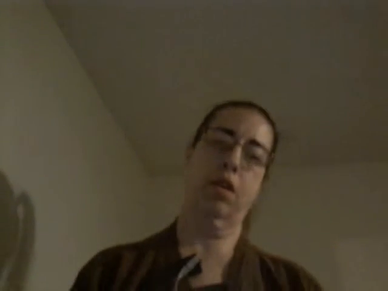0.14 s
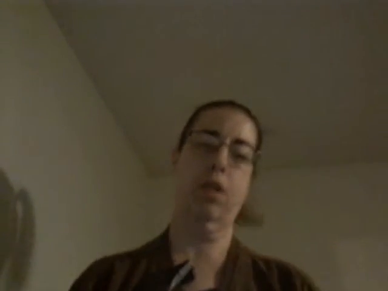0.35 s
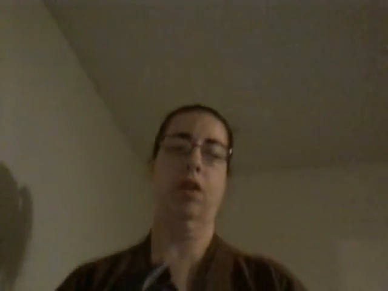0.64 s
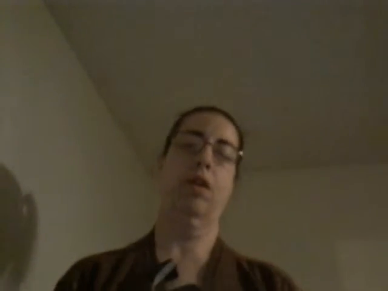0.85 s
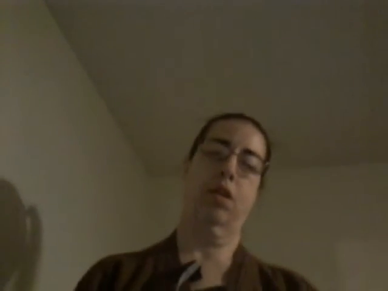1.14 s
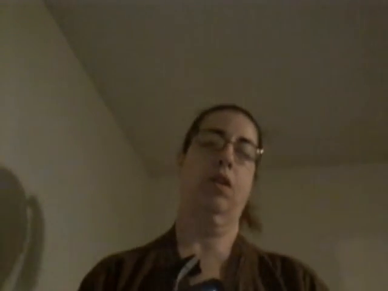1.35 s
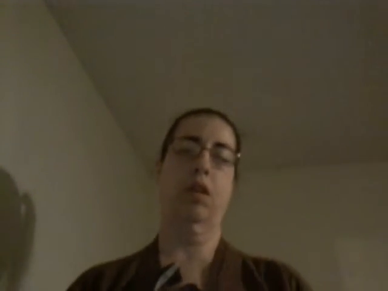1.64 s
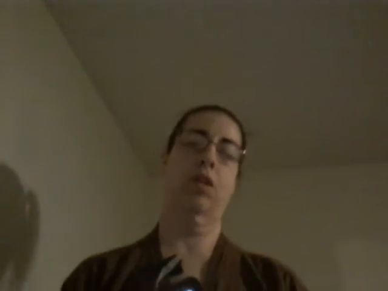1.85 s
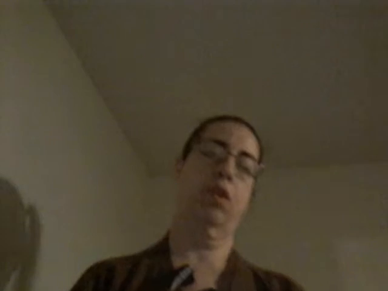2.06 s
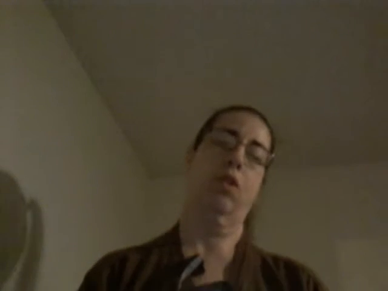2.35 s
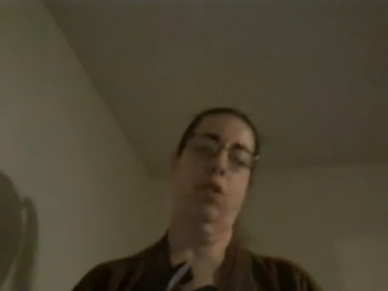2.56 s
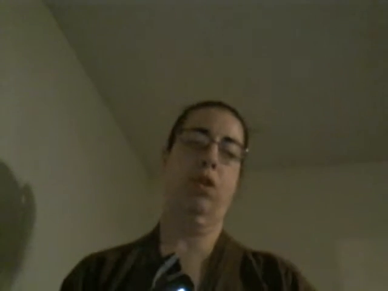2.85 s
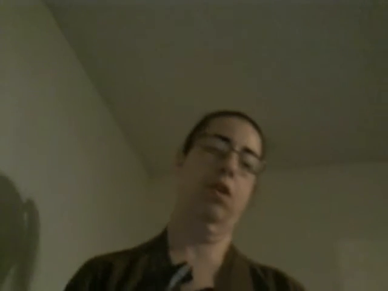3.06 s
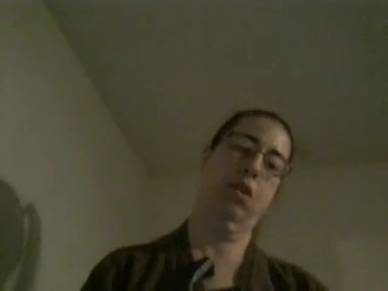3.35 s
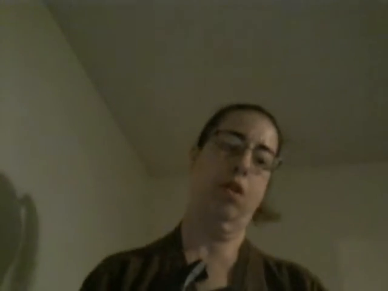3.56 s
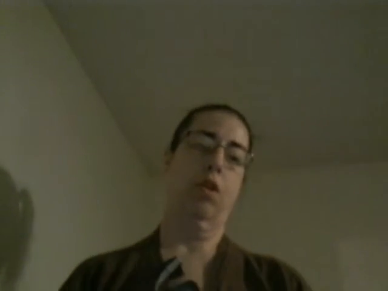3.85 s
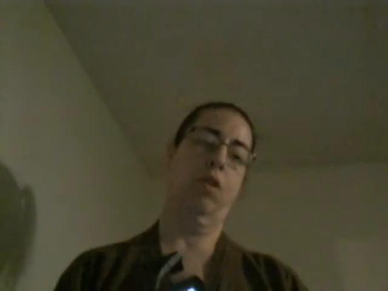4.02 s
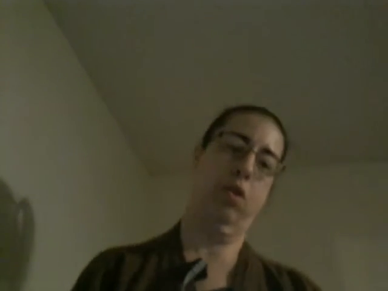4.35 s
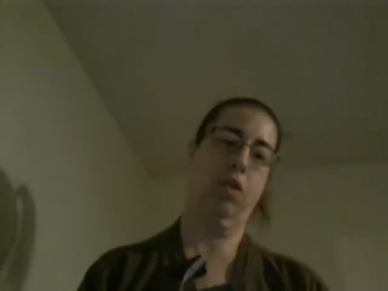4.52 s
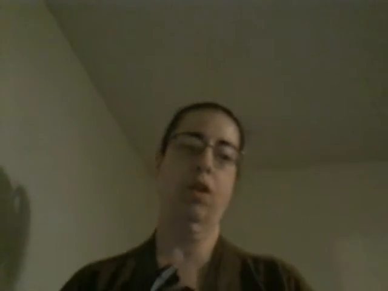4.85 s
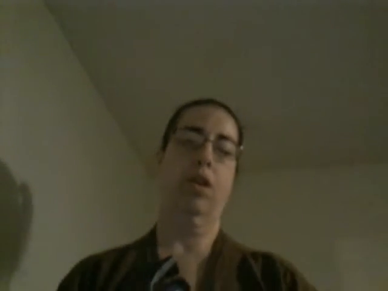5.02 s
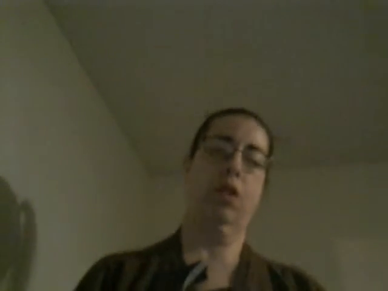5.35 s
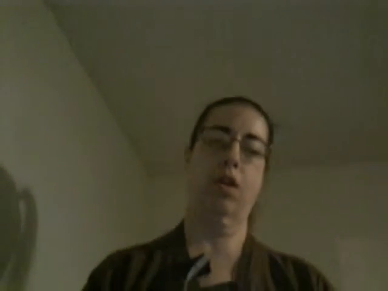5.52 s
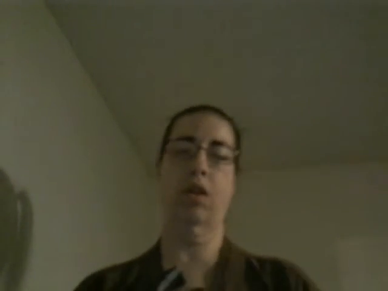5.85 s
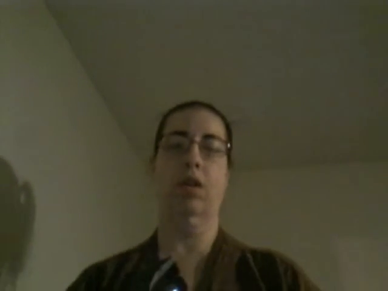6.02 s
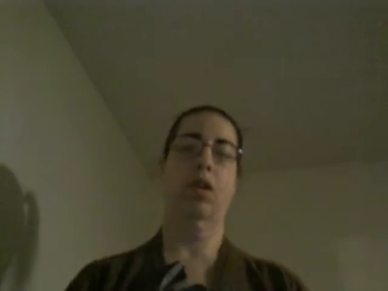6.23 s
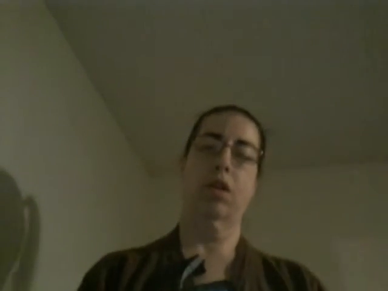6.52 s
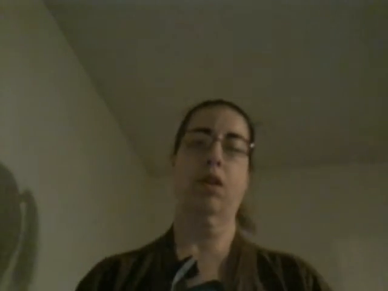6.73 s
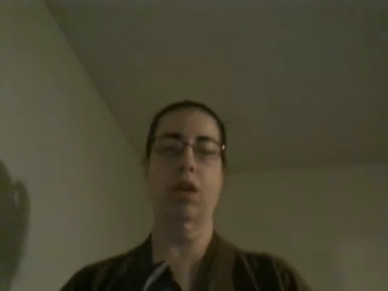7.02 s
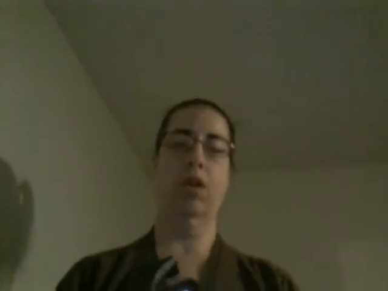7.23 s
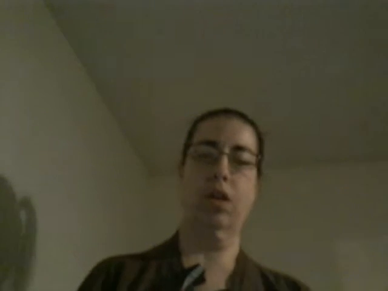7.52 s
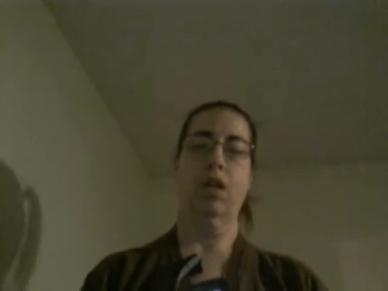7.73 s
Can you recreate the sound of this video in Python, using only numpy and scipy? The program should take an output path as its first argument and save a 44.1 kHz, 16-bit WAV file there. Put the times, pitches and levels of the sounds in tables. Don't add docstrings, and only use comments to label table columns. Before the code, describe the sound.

A treadmill is already running in a small room, close to a laptop microphone with little deep bass and softened treble. Belt rumble and hiss never stop, and a nearly pure motor whine peaks around 415 Hz at each landing, sags to about 355 Hz under the weight, then recovers. Footfalls come about every 0.53 seconds: light heel scuff, flat sole slap, dull thump and crunch of the deck, then a faint drag of the other shoe. The first step at 0.05 is mild; at 0.57 a sharper slap brings a high clean squeak and bright tick. Shorter, lower squeaks follow near 1.1, 1.7 and 2.2. From 2.7 to 6.5 steps are softer, with ticks on alternate landings and tiny grip chirps. A rough squeak comes at 7.0, then the loudest slap and squeak at 7.5, with a short room tail.

```python
import sys
import numpy as np
from scipy import signal
from scipy.fft import rfft, irfft
from scipy.io import wavfile
from scipy.ndimage import uniform_filter1d

SR = 44100
rng = np.random.default_rng(int(sys.argv[2]) if len(sys.argv) > 2 else 0)


def undo_db(level):
    steps = np.asarray(level, float) / 20
    return 10 ** steps


def file_out(sig):
    cols = np.atleast_2d(sig).T
    lim = np.clip(cols, -1, 1)
    pcm = np.round(lim * 32767).astype(np.int16)
    wavfile.write(sys.argv[1], SR, pcm)


N = 347301

# landing in seconds, sag in seconds, sag pitch in Hz.
STRIDE_CYCLES = [(-.45, -0.196, 364), (0.086, 0.312, 369.4), (0.618, 0.848, 347), (1.168, 1.397, 362),
                 (1.686, 1.94, 354.7), (2.248, 2.47, 361.3), (2.766, 3.006, 354.9), (3.31, 3.544, 362.4),
                 (3.847, 4.068, 358.4), (4.377, 4.606, 366.7), (4.908, 5.141, 352.3), (5.428, 5.655, 365.4),
                 (5.969, 6.181, 354), (6.499, 6.757, 363.8), (7.031, 7.264, 349), (7.571, 7.822, 355.7),
                 (8.1, 8.35, 355)]
# start in seconds, hiss level in dB, knock level in dB, length in seconds.
SOLE_SLAPS = [(0.042, -29, -45.5, 0.023), (0.567, -17.5, -37.5, 0.045), (1.112, -17, -39.5, 0.03),
              (1.648, -20, -43, 0.052), (2.198, -19, -38.5, 0.043), (2.724, -25, -45.5, 0.066),
              (3.261, -39, -50.5, 0.047), (3.791, -23, -43, 0.073), (4.327, -33, -48, 0.074),
              (4.847, -26, -45, 0.073), (5.377, -36.5, -49, 0.055), (5.887, -36, -50.5, 0.048),
              (5.94, -27.5, -45, 0.036), (6.435, -33, -53, 0.037), (6.4774, -32.5, -60, 0.098),
              (6.966, -23.5, -41, 0.074), (7.521, -15, -30, 0.041)]
# frequency in Hz, level in dB.
CRUNCH_SPECTRUM = [(300, -16.5), (450, 5), (600, -2.5), (900, -7.5), (1300, -14), (2000, -14.5),
                   (4000, -29)]
KNOCK_RISE_S = .004


def evened(x):
    return x / np.sqrt(np.mean(x ** 2) + 1e-20)


def read(points, hz):
    f, value = np.transpose(points)
    return np.interp(np.log(hz + 1), np.log(f + 1), value)


def add(mix, s, sound):
    part = mix[max(round(s * SR), 0):][:len(sound)]
    part += sound[:len(part)]


def coloured(x, spectrum):
    gain = undo_db(read(spectrum, np.fft.rfftfreq(len(x), 1 / SR)))
    return evened(irfft(rfft(x) * gain, len(x)))


def resonate(x, hz, width_hz):
    pole = np.exp((2j * np.pi * hz - np.pi * width_hz) / SR)
    return 2 * signal.lfilter([1 - abs(pole)], [1, -pole], x).real


def wander(seconds):
    size = int(seconds * SR)
    return evened(uniform_filter1d(uniform_filter1d(rng.standard_normal(N), size), size))


def grit(per_s, spread_db):
    clicks = rng.standard_normal(N) * (rng.random(N) < per_s / SR)
    return clicks * undo_db(spread_db * np.minimum(rng.exponential(1, N), 4))


def tent(t, start, end, rise, fall):
    return -rise * np.maximum(start - t, 0) - fall * np.maximum(t - end, 0)


def rubs(events, spectrum, rise_s, fall_s, trim_db, grains_per_s=9000, spread_db=1.0):
    noise = coloured(grit(grains_per_s, spread_db), spectrum)
    drive, t = np.zeros(N), np.arange(8000) / SR
    for s, db, length in events:
        hold = np.minimum(t / rise_s, 1) * undo_db(-60 * np.minimum(t, length))
        fall = np.exp(-np.maximum(t - length, 0) / fall_s)
        add(drive, s - rise_s / 2, undo_db(db + trim_db) * hold * fall)
    return noise * drive


def pings(events, t60_s, rise_s):
    out, t = np.zeros(N), np.arange(1500) / SR
    for s, db, hz in events:
        modes = sum(size * np.sin(2 * np.pi * hz * ratio * t)
                    for ratio, size in [(.93, 0.3), (1, 0.43), (1.1, 0.31)])
        add(out, s - rise_s, undo_db(db - 60 * t / t60_s) * (1 - np.exp(-t / rise_s)) * modes)
    return out


def bass_cut(x):
    return signal.sosfilt(signal.butter(3, 105, "high", fs=SR, output="sos"), x)


def room(x):
    # frequency in Hz, 60 dB decay time in seconds.
    decay = [(150, .45), (500, .35), (1650, .3), (2100, .21), (2600, .22), (4000, .22), (8000, .19)]
    echoes = np.zeros(SR // 2)
    at = np.arange(200, SR // 2 - 20, 20)
    echoes[at + rng.integers(0, 20, at.shape)] = rng.choice([-1., 1.], at.shape)
    hz, t, z = signal.stft(echoes, SR, nperseg=256)
    tail = signal.istft(z * undo_db(-60 * t / read(decay, hz)[:, None]), SR, nperseg=256)[1]
    return signal.fftconvolve(x, tail / np.linalg.norm(tail))[:N]


def freed():
    surge_lag_s = .02
    turning_s = (np.array(STRIDE_CYCLES)[:, :2] + [surge_lag_s, 0]).ravel()
    return np.interp(np.arange(N) / SR, turning_s, 1 - np.arange(len(turning_s)) % 2)


def belt():
    # frequency in Hz, level in dB per Hz.
    floor = [(20, -44), (100, -23.5), (159, -17), (190, -12), (300, -12), (400, -16.5), (524, -22),
             (700, -23), (886, -26), (1500, -29), (2830, -32.5), (4600, -31.5), (6600, -26), (9500, -32.5),
             (12000, -37.5), (14900, -35)]
    level_db, swell_db, swell_power = -47, 4.5, 1.4
    noise = coloured(rng.standard_normal(N), floor)
    hiss = signal.sosfilt(signal.butter(2, 1800, "high", fs=SR, output="sos"), noise)
    swell = undo_db(-1.5 + swell_db * freed() ** swell_power + 1.04 * wander(0.038))
    return undo_db(level_db) * (noise + (swell - 1) * hiss)


def motor():
    # time in seconds, depth in dB, half length in seconds.
    chokes = [
        (.94, -8, 0.036),
        (1.903, -5, 0.053),
        (3.025, -13, 0.057),
        (4.068, -5, 0.051),
        (5.19, -14, 0.037),
        (6.2, -14, 0.064),
        (7.301, -14, 0.029),
    ]
    surge_hz, recover_power, drop_power = 416.7, 1.3, 2.1
    whine_db, db_per_hz, pull_db = -35.5, 0.17, 1
    jolt_db, jolt_s, jolt_lead_s = -11.5, 0.032, 0.0044
    mode_hz, mode_width_hz, mode_db = 349, 3.1, 7.5

    t, (landing_s, sag_s, sag_hz) = np.arange(N) / SR, np.transpose(STRIDE_CYCLES)
    free = freed()
    slope = np.gradient(free)
    low_hz = np.interp(t, sag_s, sag_hz)
    surge = free ** np.where(slope > 0, recover_power, drop_power)
    hz = uniform_filter1d(low_hz + (surge_hz - low_hz) * surge, size=2500)
    turns = np.cumsum(hz + 0.72 * wander(.015)) / SR
    tone = np.sin(2 * np.pi * turns) + undo_db(-26.5) * np.sin(2 * 2 * np.pi * turns)

    pull = uniform_filter1d(np.sign(slope), size=4000)
    change_db = sum(db * np.exp(-((t - s) / half) ** 2) for s, db, half in chokes)
    change_db += sum(jolt_db * np.exp(-((t - s + jolt_lead_s) / jolt_s) ** 2) for s in landing_s)
    change_db += mode_db * np.exp(-((hz - mode_hz) / mode_width_hz) ** 2)
    level_db = whine_db + db_per_hz * (hz - surge_hz) + pull_db * pull + change_db
    return np.sqrt(2) * undo_db(level_db + 2.2 * wander(0.015)) * tone


def ticks():
    # time in seconds, peak level in dB, pitch in Hz.
    loose = [
        (0.6135, -11.5, 6760),
        (1.699, -15.5, 6430),
        (2.7791, -16.5, 6480),
        (3.8496, -14, 6960),
        (4.9106, -15, 6540),
        (5.9593, -12, 6330),
        (7.0294, -12.5, 6650),
    ]
    return pings(loose, t60_s=.016, rise_s=.001)


def deck():
    # heel in seconds, flat in seconds, heel boom in dB,
    # flat boom in dB, crunch in dB.
    landings = [(0.04, 0.095, -32.5, -32, -41.5), (0.565, 0.598, -25.5, -23.5, -30),
                (1.102, 1.176, -32, -32, -39), (1.606, 1.718, -32.5, -33.5, -36.5),
                (2.188, 2.27, -31.5, -31.5, -36), (2.71, 2.777, -33, -28, -37),
                (3.27, 3.305, -29.5, -33.5, -36.5), (3.774, 3.843, -32.5, -30, -37.5),
                (4.307, 4.36, -37.5, -27, -38.5), (4.848, 4.889, -35, -26.5, -35.5),
                (5.375, 5.44, -32, -31.5, -39), (5.884, 5.963, -31.5, -27, -36),
                (6.423, 6.503, -35.5, -32.5, -41), (6.944, 7.037, -30, -31.5, -36),
                (7.532, 7.62, -24, -32.5, -33)]
    # frequency in Hz, width in Hz, level in dB.
    deck_modes = [(165.5, 24.6, 0), (189, 23.3, -5), (228.4, 19.5, -0.5), (286.5, 30.6, -4.5),
                  (345, 18, -2), (107, 35, -29)]
    boom_rise_db_per_s, boom_fall_db_per_s, roll_dip_db_per_s = 345, 176, 50
    crunch_rise_db_per_s, crunch_fall_db_per_s, crunch_sag_db_per_s = 218, 136, 46

    knocks = grit(500, 2.2)
    boom = evened(sum((-1) ** k * undo_db(db) * resonate(resonate(knocks, hz, w), hz, 2 * w)
                      for k, (hz, w, db) in enumerate(deck_modes)))
    boom /= np.sqrt(uniform_filter1d(boom ** 2, 3000) + 0.32)
    crunch = coloured(grit(3000, 0.78), CRUNCH_SPECTRUM)
    booming, crunching = np.zeros((2, N))
    for heel, flat, heel_db, flat_db, crunch_db in landings:
        t = np.arange(max(heel - .2, 0), flat + .3, 1 / SR)
        dip_db = roll_dip_db_per_s * np.maximum(np.minimum(t - heel, flat - t), 0)
        boom_db = np.interp(t, [heel, flat], [heel_db, flat_db]) - dip_db
        boom_db += tent(t, heel, flat, boom_rise_db_per_s, boom_fall_db_per_s)
        add(booming, t[0], undo_db(boom_db))
        sag_db = crunch_sag_db_per_s * np.clip(t - heel, 0, flat - heel)
        edge_db = tent(t, heel, flat, crunch_rise_db_per_s, crunch_fall_db_per_s)
        add(crunching, t[0], undo_db(crunch_db - sag_db + edge_db))
    return bass_cut(booming * boom + undo_db(-2.5) * crunching * crunch)


def thuds():
    s, _, knock_db, length = np.transpose(SOLE_SLAPS)
    level_db = -38.5 + 0.54 * (knock_db + 41.5)
    return bass_cut(rubs(zip(s, level_db, length), CRUNCH_SPECTRUM, KNOCK_RISE_S, 0.023, 0.0,
                      grains_per_s=1500, spread_db=2.5))


def shoes():
    # start in seconds, level in dB, length in seconds.
    scuff_events = [(0.422, -31.5, 0.047), (1.493, -35, 0.028), (2.1394, -56, 0.041), (2.5714, -29, 0.035),
                    (3.1303, -33, 0.025), (3.6541, -29.5, 0.021), (4.2022, -33.5, 0.037),
                    (4.7087, -29.5, 0.031), (5.259, -33.5, 0.027), (5.7738, -32, 0.02),
                    (6.317, -33.5, 0.031), (6.8329, -31.5, 0.025), (7.387, -37.5, 0.023)]
    # start in seconds, level in dB, length in seconds.
    drag_events = [
        (0.0014, -34, 0.016),
        (0.5, -36, 0.029),
        (1.048, -37.5, 0.029),
        (3.2026, -35, 0.022),
        (4.2625, -28.5, 0.029),
        (5.323, -32.5, 0.028),
        (6.3899, -31.5, 0.025),
        (7.4689, -38, 0.037),
    ]
    # start in seconds, level in dB, length in seconds.
    tap_events = [
        (0.956, -39.5, 0.013),
        (1.856, -60, 0.012),
        (2.038, -40.5, 0.0075),
        (3.12, -35.5, 0.01),
        (4.179, -38, 0.013),
        (5.247, -36.5, 0.013),
        (6.312, -38, 0.0084),
        (7.37, -37, 0.011),
    ]
    # frequency in Hz, level in dB.
    scuff_spectrum = [(290, -22), (500, -34), (529, -24), (934, 0), (1290, -12.5), (2420, -10.5),
                      (3760, -3), (6920, 0), (13700, -15.5), (14900, -30)]
    drag_spectrum = [(2500, -18), (4500, -15), (6000, -7.5), (7000, -4.5), (8500, -13.5), (12000, -34)]
    slap_spectrum = [(3000, -3), (4500, -9.5), (5500, -3.5), (6800, -2), (9000, -8), (11500, -21.5),
                     (14900, -17)]
    knock_spectrum = [(700, -4.5), (1100, -3.5), (1700, -9), (2500, 1), (3400, -3), (4500, -5), (7000, -43)]
    tap_spectrum = [(500, -11), (800, -2), (1080, 0), (1400, -9), (2000, -15), (3500, -39)]

    s, hiss_db, knock_db, length = np.transpose(SOLE_SLAPS)
    slaps = rubs(zip(s, hiss_db, length), slap_spectrum, 0.0068, 0.03, -14)
    knocks = rubs(zip(s, knock_db, length), knock_spectrum, KNOCK_RISE_S, 0.03, 1.55,
                  grains_per_s=1300, spread_db=2.0)
    scuffs = rubs(scuff_events, scuff_spectrum, .007, 0.022, -8.5)
    drags = rubs(drag_events, drag_spectrum, 0.0052, 0.011, -9)
    taps = rubs(tap_events, tap_spectrum, 0.0041, 0.016, -8.0)
    return slaps + knocks + scuffs + drags + taps


def catches():
    # time in seconds, peak level in dB, pitch in Hz.
    grabs = [
        (1.857, -30.5, 604),
        (2.761, -30, 3690),
        (4.331, -24, 2460),
        (4.341, -23.5, 1987),
        (4.853, -25, 761),
        (4.908, -25.5, 2227),
        (5.38, -31, 2450),
        (6.988, -18, 2560),
        (7.006, -22, 2767),
        (7.022, -24, 2640),
    ]
    return pings(grabs, t60_s=0.041, rise_s=0.00196)


def squeak(start, end, first_hz, last_hz, rough):
    # time in seconds, level in dB, tilt in dB per octave.
    grips = [(.582, -10, 5.5), (.59, -21, 6), (0.604, -13.5, 3), (1.129, -14, -3), (1.142, -18, 7),
             (1.678, -25.5, -10), (1.699, -29.5, -4), (2.207, -14.5, 4), (2.217, -18, 9),
             (2.228, -13.5, 2.5), (6.99, -30, 10), (7.015, -30, -13), (7.533, -5, 4.5), (7.544, -5, 5),
             (7.558, -22, 8), (7.57, -13, 5)]
    # frequency in Hz, level in dB.
    sole = [(400, -35), (1100, -24), (1620, -4.5), (2150, 3), (2600, -15), (2850, -24), (3350, -19),
            (3800, -12.5), (4400, -15), (4950, -44), (5500, -23), (6400, -24.5), (7600, -27), (11000, -44)]
    grip_rise_db_per_s, grip_fall_db_per_s, settle_s = 1797, 1093, .029

    t, (s, db, tilt) = np.arange(start, end, 1 / SR), np.transpose(grips)[..., None]
    level_db = (db + tent(t, s, s, grip_rise_db_per_s, grip_fall_db_per_s)).max(0)
    tilt_db = np.interp(t, s[:, 0], tilt[:, 0])
    glide = np.sin(np.pi / 2 * np.minimum((t - start) / settle_s, 1)) ** 2
    hz = first_hz + (last_hz - first_hz) * glide
    shake = evened(uniform_filter1d(rng.standard_normal(len(t)), 120))
    turns = np.cumsum(hz * (1 + .11 * rough * shake)) / SR

    k = np.arange(1, 28)[:, None]
    heights = undo_db(read(sole, k * hz) + tilt_db * np.log2(k * hz / 2150))
    heights = heights * (k * hz < np.where(hz > 1000, 7000, 12000))
    slips = (heights * np.cos(2 * np.pi * (k * turns + rng.random(k.shape)))).sum(0)
    slips /= np.sqrt((heights ** 2).sum(0) / 2)
    hiss = coloured(rng.standard_normal(len(t)), sole)
    mix = (1 - rough) * slips + rough * hiss
    flutter_db = 0.51 * evened(uniform_filter1d(rng.standard_normal(len(t)), 150))
    return undo_db(level_db + flutter_db) * mix * signal.windows.tukey(len(t), .15)


def squeaks():
    # start in seconds, end in seconds, first and last slips per second, roughness 0 to 1.
    slides = [
        (.568, .606, 2545, 2625, .07),
        (1.115, 1.148, 536, 542, .14),
        (1.668, 1.71, 553, 556, .3),
        (2.198, 2.25, 540, 561, .16),
        (6.978, 7.035, 625, 545, .5),
        (7.521, 7.58, 508, 553, .23),
    ]
    out = np.zeros(N)
    for row in slides:
        add(out, row[0], squeak(*row))
    return out


def scene():
    tick = ticks()
    near = squeaks() + shoes() + catches()
    tail = undo_db(-6.5) * room(near + 0.3 * tick)
    mono = near + tick + tail + deck() + motor() + belt() + thuds()
    return np.array([mono, mono])


def starved(x):
    # frequency in Hz, height over the usual level in dB.
    bar_db = [(8000, -30), (9800, -10), (11000, -2), (12000, 1), (13500, 3), (14600, 5.5)]
    lead = 184
    frame = dict(window="cosine", nperseg=2048, noverlap=1024)
    hz, t, z = signal.stft(np.pad(x, (lead, 0)), SR, **frame)
    usual = uniform_filter1d(np.median(abs(z), 1), size=31)[:, None]
    loud_db = 10 * np.log10((abs(z[hz < 3000]) ** 2).sum(0) + 1e-12)
    raise_db = .85 * np.clip(loud_db - np.median(loud_db), -3, 14)
    bar = usual * undo_db(read(bar_db, hz)[:, None] + raise_db)
    kept = z * ((abs(z) > bar) | (hz[:, None] < 8000))
    return signal.istft(kept, SR, **frame)[1][lead:lead + N]


def low_pass(x):
    return signal.sosfilt(signal.butter(12, 15050, fs=SR, output="sos"), x)


def record(dry):
    mono = signal.sosfilt(signal.butter(2, 45, "high", fs=SR, output="sos"), dry[0])
    mono = 1.3 * np.tanh(mono / 1.3).clip(-.7, .7)
    edge = signal.firwin(401, 14650, window=("kaiser", 9), fs=SR)
    mono = starved(signal.oaconvolve(mono, edge, "same"))
    return low_pass(np.array([mono, mono]))


dry = scene()
out = record(dry)
file_out(out)
```